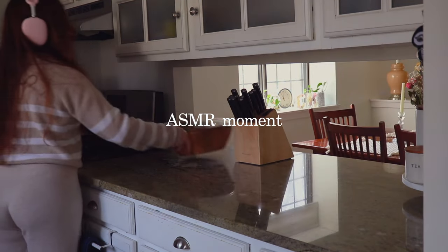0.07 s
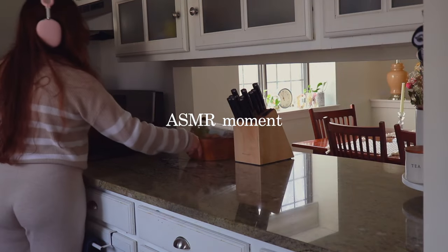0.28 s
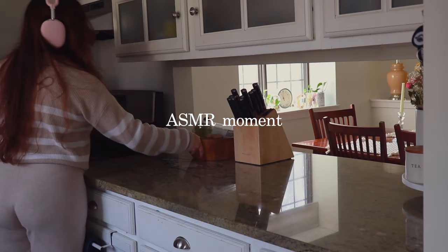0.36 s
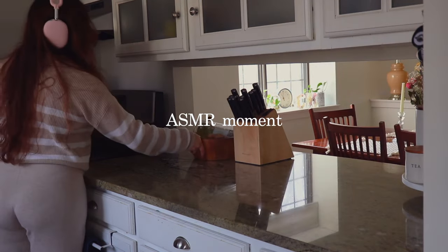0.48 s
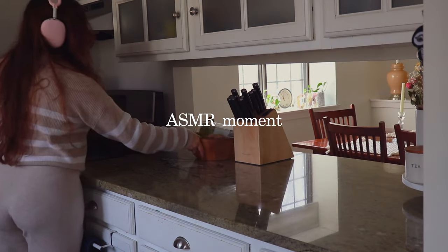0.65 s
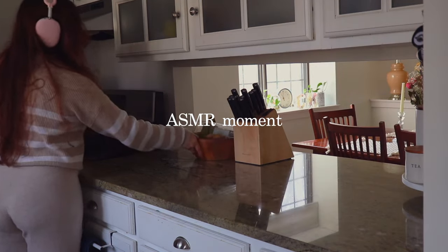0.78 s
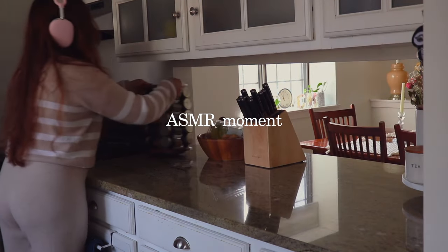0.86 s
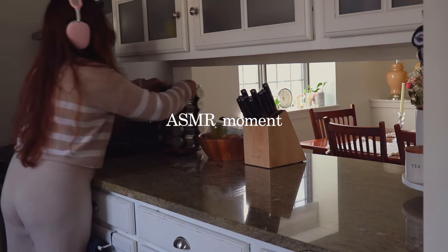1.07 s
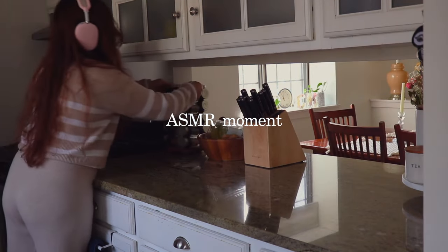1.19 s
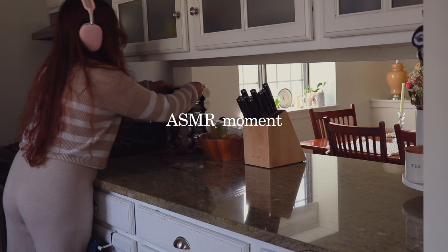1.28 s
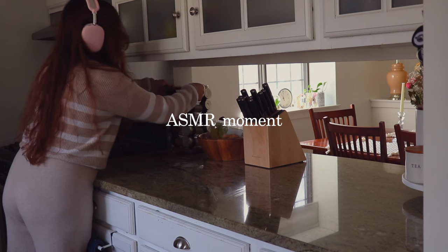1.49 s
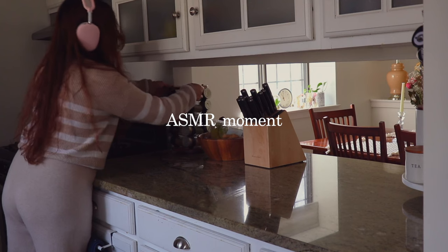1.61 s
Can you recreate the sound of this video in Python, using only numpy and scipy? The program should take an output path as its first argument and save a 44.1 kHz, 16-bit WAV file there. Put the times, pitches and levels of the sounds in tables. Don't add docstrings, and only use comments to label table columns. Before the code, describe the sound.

Hard wood-on-stone knocks on a kitchen countertop, a short scrape, then soft thuds and light rattling

```python
import sys
import numpy as np
from scipy import signal
from scipy.fft import rfft, irfft
from scipy.io import wavfile
from scipy.ndimage import uniform_filter1d

SR = 44100
rng = np.random.default_rng(int(sys.argv[2]) if len(sys.argv) > 2 else 0)


def convert_level_to_amplitude(level_db):
    exponent = np.asarray(level_db, float) / 20
    return 10 ** exponent


def generate_wav(sig):
    pcm = np.round(np.clip(np.atleast_2d(sig).T, -1, 1) * 32767).astype(np.int16)
    wavfile.write(sys.argv[1], SR, pcm)


N = 72765

# (time [s], level [dB], contact [ms], chatter [ms], pitch favoured by the spot struck [Hz])
BOWL_HITS = [(.2360, 0.5, 0.17, 0.19, 700), (.2378, 8.5, 0.079, 0.47, 700), (.2428, 6, 0.089, .2, 700),
             (.2515, -7, 0.26, 4, 600), (.260, -7, 0.12, 3, 720), (.268, -6, 0.3, 2.3, 1200),
             (.2895, -3, 0.21, 2.3, 763), (.304, -2.5, 0.11, 2.4, 730), (.313, -13, 0.12, 6.6, 1370),
             (.333, -3.5, 0.1, 5.4, 760), (.346, -7, 0.053, 5.8, 720), (.3665, -2, 0.46, 2.7, 495),
             (.367, -13.5, 0.064, 1.8, 2200), (.382, -7.5, 0.37, 2.9, 650), (.394, -19, 0.3, 5.5, 516),
             (.408, -14, 0.24, 1.2, 560), (.422, -12.5, 0.079, 2, 640), (.432, -13.5, 0.49, 3, 500),
             (.445, -26.5, 0.1, 1.6, 730), (.458, -18, 0.18, 5.7, 680)]
KNOCK_HITS = [
    (.7447, -4, 0.1, 0.46, 2453),
    (.7470, -3, 0.11, 2.55, 586),
    (.760, -7.5, 0.071, 2.8, 815),
    (.775, -10.5, 0.099, 12, 880),
    (.796, -20.5, 0.23, 14, 806),
    (.808, -8, 0.1, 9.2, 720),
    (.832, -29, 0.053, 5.2, 880),
]
PAD_HITS = [
    (.155, -32, 0.22, 28, 417),
    (1.016, -18.5, 0.081, 81, 557),
    (1.03, -29.5, 0.12, 4.5, 540),
    (1.0855, -17, 0.036, 15, 1100),
    (1.090, -17, 0.34, 24, 483),
    (1.112, -26.5, 0.22, 5.2, 480),
    (1.2165, -21.5, 0.052, 8.0, 1240),
    (1.219, -21.5, .3, 2.9, 480),
    (1.230, -20, 0.13, 4, 512),
]
RATTLE_HITS = [(.1325, -28, 0.07, 18, 2255), (1.2645, -22.5, 0.02, 4, 7400),
               (1.273, -14.5, 0.035, 3.3, 3470), (1.284, -36, 0.086, 2.5, 3470),
               (1.298, -29, 0.11, 3.1, 2620), (1.311, -32, 0.054, 3.8, 2480),
               (1.324, -24.5, 0.055, 5.8, 1480), (1.337, -27, 0.12, 7.9, 1490),
               (1.355, -20.5, 0.074, 11, 2550), (1.363, -27, 0.059, 3.4, 2500),
               (1.370, -30, 0.15, 3.4, 1250), (1.401, -35.5, 0.08, 4.8, 2930),
               (1.406, -25, 0.073, 7.3, 2180), (1.42, -33, 0.14, 5.9, 1300),
               (1.445, -40.5, 0.065, 3.7, 1300), (1.636, -40, 0.045, 6.1, 4300)]
SLIDE_TICKS = [
    (.65, -50, 0.018, 1.5, 4170),
    (.691, -27, 0.011, 2.8, 4140),
    (.712, -39, .02, 3.0, 4200),
]

# (frequency [Hz], level [dB], decay t60 [s])
BOWL_MODES = [(403, -22.5, 0.05), (495, -6, 0.13), (546, 3.5, 0.06), (656.4, -2, 0.026),
              (730.4, 4.5, 0.031), (952, -8.5, 0.07), (1152, -5.5, 0.052), (1370, 12, 0.012),
              (1711, -0.5, 0.077), (2082, 7, 0.0068), (2454, 2, 0.062), (3137, -0.5, 0.04),
              (3750, -7, 0.045), (5400, -25.5, 0.011)]
BLOCK_MODES = [(314, -22.5, 0.24), (415, -15, 0.13), (520, -6.5, 0.039), (585, 1, 0.021), (720, -6, 0.02),
               (877, -5, 0.075), (978, 9.5, 0.0078), (1406, -6, 0.074), (1680, 8.5, 0.01),
               (2232, 9.5, 0.0038), (2658, 1, 0.0098), (3290, 2.5, 0.008), (4160, 1.5, 0.0097),
               (4450, -1.5, 0.0055)]
PAD_MODES = [(215, -15, 0.17), (370, -4, 0.04), (476.3, 0, 0.031), (547, -5.5, 0.0472),
             (741, -24.5, 0.0046), (1175, 15, 0.0079), (1147, 1.5, 0.021), (1350, -5, 0.019),
             (2032, 1.5, 0.0155), (2650, 7, 0.0024), (4000, -15, 0.011), (5130, -37, 0.0028),
             (8800, 10, 0.0068)]
RACK_MODES = [(1030, -18, 0.029), (1242, 5.5, 0.0046), (1786, -1.5, 0.015), (2590, 3, 0.0046),
              (2990, -8.5, 0.022), (3480, -2.5, 0.007), (4395, -8.5, 0.023), (4910, -0.5, 0.0041),
              (7400, -11, 0.0054), (7800, -23, 0.0069)]
# (frequency [Hz], t60 [s])
KITCHEN_DECAY = [(100, 0.37), (400, 0.43), (800, 0.64), (2000, 0.6), (5000, 0.66), (12000, 0.11)]

# (time [s], level [dB])
SLIDE_LEVEL = [(0.48, -73), (0.496, -62.5), (0.602, -45.5), (0.698, -45), (0.736, -63), (0.75, -40)]
# (time [s], level [dB])
SHUFFLE_LEVEL = [(1.262, -39), (1.275, -44), (1.36, -43), (1.42, -53), (1.5, -71), (1.58, -92.5)]
# (time [s], level [dB])
SWAY_LEVEL = [(0, -67), (.06, -58), (.25, -77), (.31, -55.5), (.38, -61), (.42, -39), (.47, -44),
              (.51, -42.5), (.55, -59), (.8, -61.5), (1.1, -58), (1.27, -70), (1.32, -45), (1.5, -44.5),
              (1.55, -52), (1.6, -50), (1.65, -56.5)]
# (time [s], level [dB])
STIR_LEVEL = [(0, -77), (.22, -65), (.3, -50.5), (.48, -47), (.56, -64.5), (.74, -54.5), (.8, -46),
              (1.0, -56.5), (1.26, -47), (1.32, -60.5), (1.65, -73)]
# (time [s], level [dB])
NEW_SHOT_LEVEL = [(.853, -66), (.858, -42), (.9, -43.5), (.95, -49.5), (1.02, -55), (1.1, -72)]

# (frequency [Hz], level [dB per Hz])
SLIDE_COLOUR = [(180, -31), (300, -25.5), (667, -8), (725, -27.5), (842, -13.5), (2210, -13), (2930, -16),
                (7080, -22), (16000, -40)]
# (frequency [Hz], level [dB per Hz])
AIR_COLOUR = [(59, -28), (100, -48.5), (129, -7.5), (174, -2.5), (638, -13), (897, -13), (5370, -21.5),
              (9150, -21.5), (16300, -25)]
# (frequency [Hz], level [dB per Hz])
NEW_SHOT_COLOUR = [(100, -24.5), (270, -2), (550, 0.5), (1200, -6.5), (2500, -11), (5000, -19), (9000, -32),
                   (16000, -52)]
# (frequency [Hz], level [dB per Hz])
RUMBLE_COLOUR = [(15, -48), (30, -15), (80, -11.0), (160, -17.5), (320, -43.5), (2000, -98.5)]

AIR_DB, SWAY_HZ = -56.5, 34.5
CHANGE_S, LEFT_AFTER_CHANGE_DB = .8555, -24
SPOT_DB, SPOT_DETUNE = 2.0, .012
FAVOUR_DB, FAVOUR_WIDTH, FAVOUR_RING = 11, 0.14, 0.57
DUCK_FROM_DB, DUCK_SHARE, RECOVER_DB_PER_S = -12.5, 0.63, 80


def evened(x):
    return x / np.sqrt(np.mean(x ** 2) + 1e-20)


def curve(points):
    s, db = np.transpose(points)
    return convert_level_to_amplitude(np.interp(np.arange(N) / SR, s, db, left=-120, right=-120))


def coloured(x, points):
    f, db = np.transpose(points)
    hz = np.fft.rfftfreq(len(x), 1 / SR)
    gain = convert_level_to_amplitude(np.interp(np.log(hz + 1), np.log(f), db))
    return evened(irfft(rfft(x) * gain, len(x)))


def grit(per_s, spread_db):
    size = rng.standard_normal(N) * convert_level_to_amplitude(spread_db * np.minimum(rng.exponential(1, N), 4))
    return size * (rng.random(N) < per_s / SR)


def ring(modes):
    t = np.arange(SR // 8) / SR
    h = np.zeros(len(t))
    for k, (hz, db, t60) in enumerate(modes):
        sign = (-1) ** (k * (hz > 800))
        h += sign * convert_level_to_amplitude(db - 60 * t / max(t60, .004)) * np.sin(2 * np.pi * hz * t)
    return h / abs(h).max()


def kitchen(x, wet_db):
    hz, t, z = signal.stft(rng.standard_normal(SR), SR, nperseg=256)
    f, t60 = np.transpose(KITCHEN_DECAY)
    band_t60 = np.interp(np.log(hz + 1), np.log(f), t60)[:, None]
    tail = signal.istft(z * convert_level_to_amplitude(-60 * t / band_t60), SR, nperseg=256)[1]
    tail *= np.minimum(np.arange(len(tail)) / SR / 0.0017, 1)
    return convert_level_to_amplitude(wet_db) * signal.fftconvolve(x, tail / np.linalg.norm(tail))[:N]


def strike(hits, modes, crack_db, wet_db, shadow_hz, low_hz=210, walls_hz=9300):
    out, t = np.zeros((N + SR, 2)), np.arange(2000) / SR
    spots = rng.standard_normal((len(hits), len(modes), 2))
    noise = rng.standard_normal((len(hits), 2, 2000))
    for (s, db, ms, chatter_ms, pitch_hz), spot, (size, when) in zip(hits, spots, noise):
        lift = np.exp(-(np.log(np.array(modes)[:, 0] / pitch_hz) / FAVOUR_WIDTH) ** 2)
        struck = []
        for (hz, mode_db, t60), v, w in zip(modes, spot, lift):
            level = mode_db + SPOT_DB * v[0] + FAVOUR_DB * w
            struck.append((hz * (1 + SPOT_DETUNE * v[1]), level, t60 * (1 + FAVOUR_RING * w)))
        body = ring(struck)
        body[:3] += convert_level_to_amplitude(crack_db) * np.array([1, 0, -1])

        u = t / (max(ms, .01) / 2000)
        blow = signal.fftconvolve(body, u * np.exp(-u))
        blow *= convert_level_to_amplitude(db) / abs(blow).max()

        dying = np.exp(-t * 1000 / max(chatter_ms, .1))
        chatter = np.sign(size) * (when > 1.5) * (t > .0006) * dying + (t == 0)
        near = signal.fftconvolve(blow, chatter)[:len(blow)]
        near *= np.linalg.norm(blow) / np.linalg.norm(near)
        out[round(s * SR):][:len(blow)] += np.transpose([near, blow])
    small_body = signal.butter(4, low_hz, "high", fs=SR, output="sos")
    near, far = signal.sosfilt(small_body, out[:N].T)
    near = signal.lfilter(*signal.butter(2, shadow_hz, fs=SR), near)
    far = signal.lfilter(*signal.butter(2, walls_hz, fs=SR), far)
    return near + kitchen(far, wet_db)


def room_air():
    air = convert_level_to_amplitude(AIR_DB) * coloured(rng.standard_normal(N), AIR_COLOUR)
    return air + curve(NEW_SHOT_LEVEL) * coloured(rng.standard_normal(N), NEW_SHOT_COLOUR)


def sway():
    note = np.sqrt(2) * np.sin(2 * np.pi * SWAY_HZ * np.arange(N) / SR)
    rumble = coloured(rng.standard_normal(N), RUMBLE_COLOUR)
    return curve(SWAY_LEVEL) * note + curve(STIR_LEVEL) * rumble


def rack():
    shuffle = signal.fftconvolve(grit(1500, 2.5), ring(RACK_MODES))[:N]
    loose = curve(SHUFFLE_LEVEL) * evened(shuffle)
    pads = strike(PAD_HITS, PAD_MODES, 1.3, -3.0, 5500)
    return pads + strike(RATTLE_HITS, RACK_MODES, 1.2, -5.0, 7400) + loose


def knock():
    return strike(KNOCK_HITS, BLOCK_MODES, 5.4, -5.0, 4140, low_hz=270)


def slide():
    hiss = curve(SLIDE_LEVEL) * convert_level_to_amplitude(7.5) * coloured(grit(6000, 0.93), SLIDE_COLOUR)
    catches = strike(SLIDE_TICKS, RACK_MODES[6:], 5.0, -8.0, 16000)
    return hiss + kitchen(hiss, -10.5) + catches


def bowl():
    return strike(BOWL_HITS, BOWL_MODES, 3.0, -5.5, 2200, low_hz=322, walls_hz=6900)


def scene():
    first = bowl() + knock() + slide()
    after = np.clip((np.arange(N) / SR - CHANGE_S) / 0.0011, 0, 1)
    first *= convert_level_to_amplitude(LEFT_AFTER_CHANGE_DB * after)
    return (first + rack() + sway() + room_air())[None]


def roll_off(x):
    return signal.sosfilt(signal.butter(12, 16410, fs=SR, output="sos"), x)


def record(dry):
    power_db = 10 * np.log10(abs(uniform_filter1d(dry[0] ** 2, size=200, origin=99)) + 1e-12)
    fall = np.arange(N) * RECOVER_DB_PER_S / SR
    fall = fall + 100 * (np.arange(N) > CHANGE_S * SR)
    held_db = np.maximum.accumulate(power_db + fall) - fall
    over_db = np.maximum(held_db - DUCK_FROM_DB, 0)
    lagged_db = uniform_filter1d(over_db, size=500, origin=249)
    ducked = convert_level_to_amplitude(1.44) * dry / convert_level_to_amplitude(DUCK_SHARE * lagged_db)
    clipped = .97 * ducked / (1 + ducked ** 6) ** (1 / 6)
    top_edge = signal.firwin(301, 15900, fs=SR)[None]
    mix = signal.oaconvolve(clipped, top_edge, "same")
    return roll_off(mix)


dry = scene()
out = record(dry)
generate_wav(out)
```